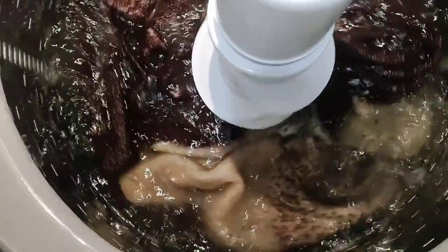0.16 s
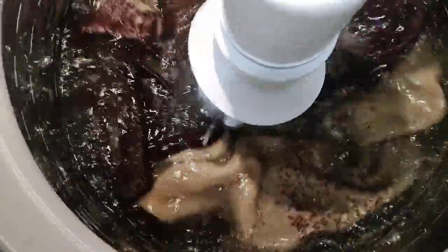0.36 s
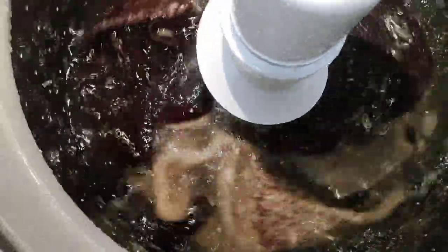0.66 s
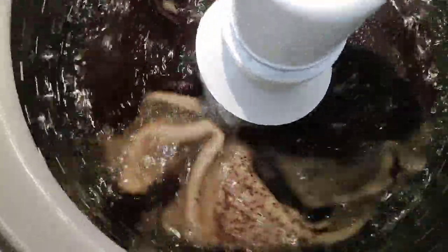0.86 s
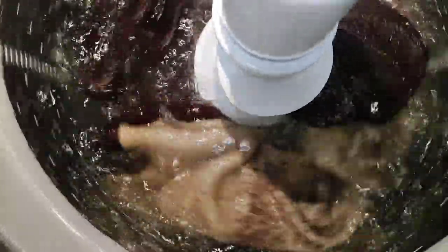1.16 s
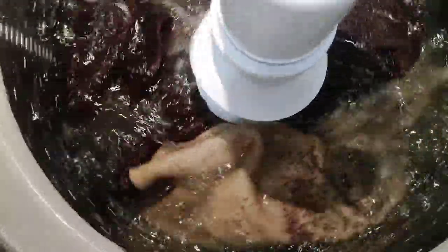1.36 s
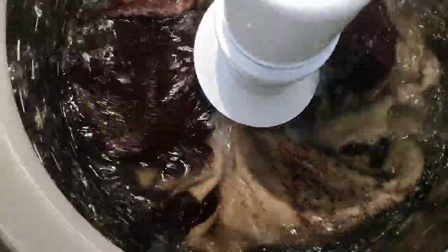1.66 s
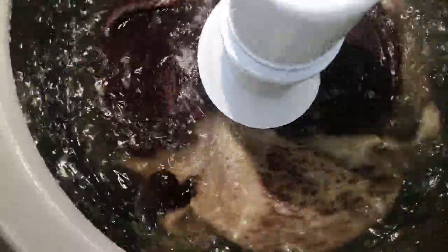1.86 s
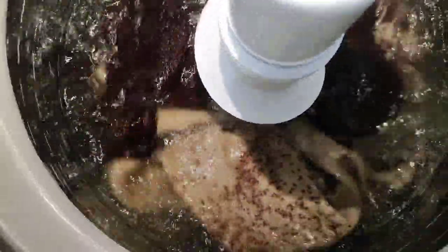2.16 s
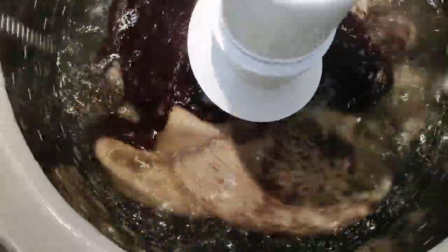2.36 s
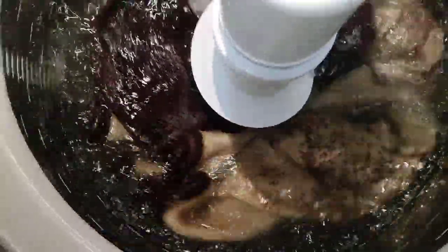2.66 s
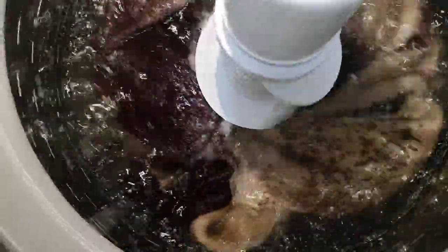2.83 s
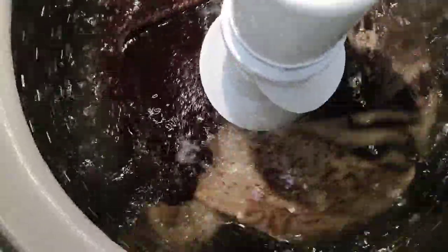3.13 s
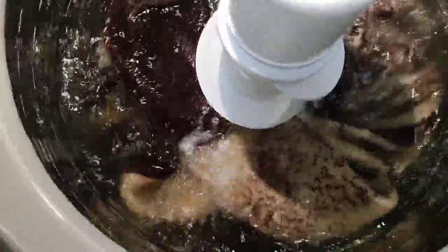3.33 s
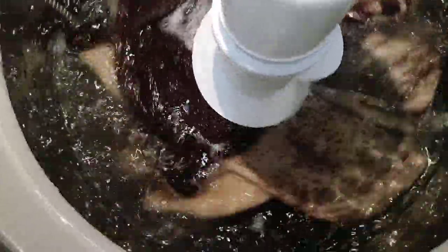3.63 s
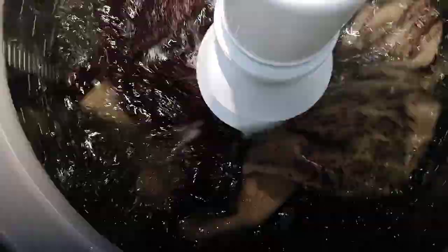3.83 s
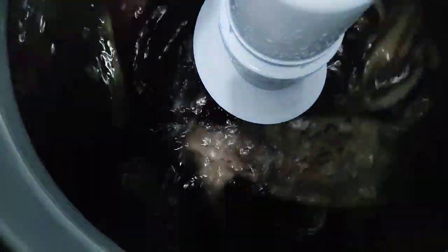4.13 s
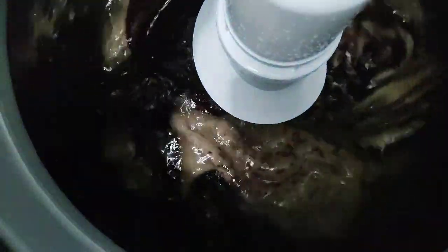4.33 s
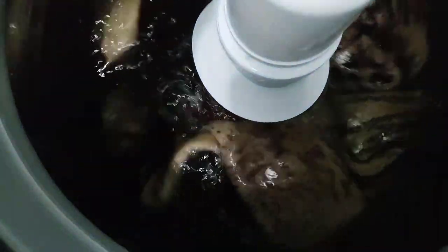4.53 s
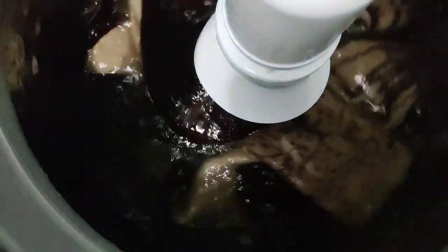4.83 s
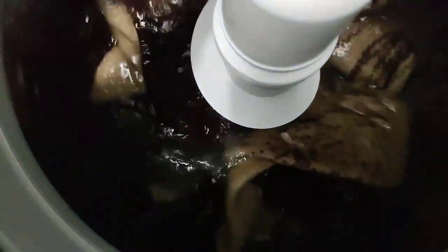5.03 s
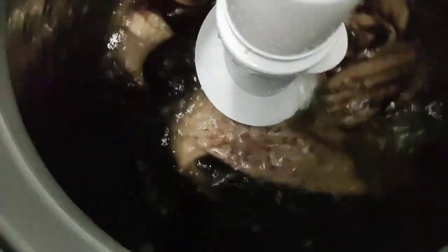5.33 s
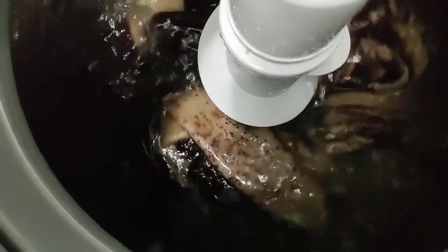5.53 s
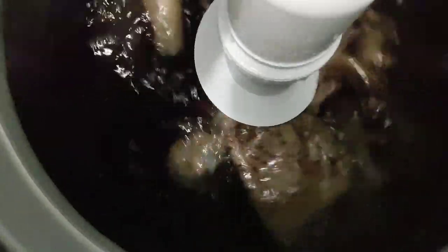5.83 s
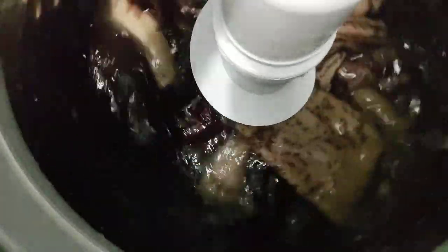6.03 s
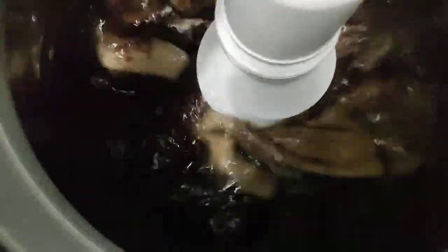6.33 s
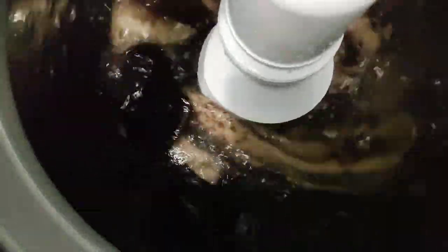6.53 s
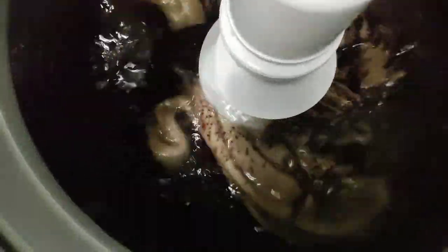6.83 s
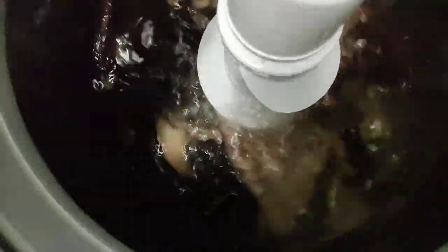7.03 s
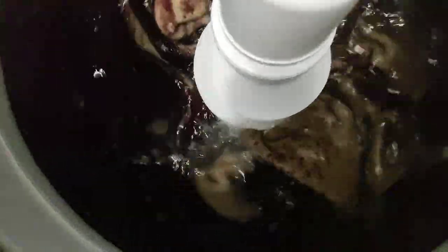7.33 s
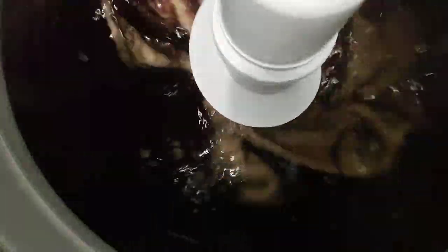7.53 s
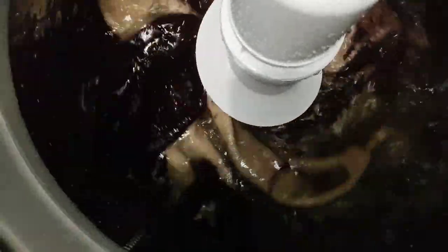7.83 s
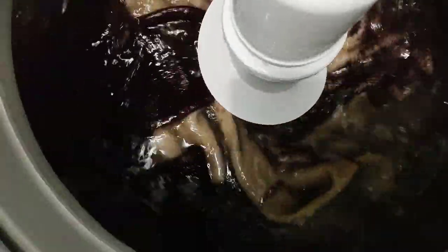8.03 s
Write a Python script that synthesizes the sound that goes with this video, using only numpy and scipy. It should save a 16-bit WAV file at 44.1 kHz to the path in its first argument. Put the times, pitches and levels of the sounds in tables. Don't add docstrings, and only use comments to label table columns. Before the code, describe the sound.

A top-loading washing machine agitates wet laundry, its motor whine pulsing on and off every 0.6 seconds with knocks, watery thuds and light splashes.

```python
import sys
import numpy as np
from scipy import signal
from scipy.fft import rfft, irfft, next_fast_len
from scipy.io import wavfile
from scipy.ndimage import uniform_filter1d

SR = 44100
rng = np.random.default_rng(int(sys.argv[2]) if len(sys.argv) > 2 else 0)


def dump_mix(stems):
    frames = np.atleast_2d(stems).T
    limited = np.clip(frames, -1, 1)
    pcm = np.round(limited * 32767).astype(np.int16)
    wavfile.write(sys.argv[1], SR, pcm)


def how_loud(loudness_db):
    steps = np.asarray(loudness_db, float) / 20
    return 10 ** steps


N = 361179
T = np.arange(N) / SR
PAD = next_fast_len(N + 8192)
HZ = np.fft.rfftfreq(PAD, 1 / SR) + 1e-3

# drive cut in seconds, whine in dB, tooth slip in dB,
# octave in dB re whine, belt in dB.
STROKES = [(-0.11, -36, 1, -17, 0), (0.49, -24.5, 0, -18, 0.5), (1.095, -31.5, -2, -13, 0),
           (1.692, -24.5, -1.5, -22, 2), (2.289, -32.5, 1.5, -13.5, -0.5), (2.89, -24.5, -3.5, -17, 1),
           (3.491, -31, -2.5, -20, 0.5), (4.09, -24, -4, -16.5, 1), (4.689, -30.5, -2.5, -16.5, 1),
           (5.29, -24, -12, -18.5, 0.5), (5.891, -31, 1, -15.5, -0.5), (6.492, -25, -11, -21, -0.5),
           (7.09, -32, -3, -18, 1), (7.69, -27, -5.5, -10.5, 0), (8.29, -36, 3, -11, 3)]
# surge in dB, froth while driven in dB, froth while coasting in dB,
# unrest before the stroke in dB, extra coasting in seconds.
WATER = [(6, 0.5, 2, 0, 0.03), (-2, -0.5, -1, 0, .01), (0.5, 1, 0, -6.5, -0.016),
         (-0.5, 0.5, 1.5, -2.5, .015), (1, -2, -1.5, -6.5, -.02), (-4.5, 2.5, -3, 1, 0.01),
         (2, 0, -6, -6.5, .02), (0.5, -3, -3.5, 0.5, .01), (0.5, 0.5, -4.5, 1.5, .01),
         (-2, -1.5, 4, 3, .045), (1.5, 2, 2, 5.5, -.03), (-0.5, 4.5, 0, 7, .02), (-1, 1.5, 0.5, -1, .001),
         (0, 3, 2.5, -0.5, .01), (0, 3.5, 0, -5, 0)]


def level(x, db):
    return x * how_loud(db) / np.sqrt(np.mean(x ** 2))


def colour(x, points):
    hz, db = np.transpose(points)
    gain_db = np.interp(np.log(HZ), np.log(hz), db, left=-90, right=-90)
    return irfft(rfft(x, PAD) * how_loud(gain_db), PAD)[:N]


def ring(x, hz, width_hz, db):
    gain = 0
    for k, (f, width, mode_db) in enumerate(zip(hz, width_hz, db)):
        damping = 1j * HZ * width
        gain = gain + (-1) ** k * how_loud(mode_db) * damping / (f * f - HZ ** 2 + damping)
    return irfft(rfft(x, PAD) * gain, PAD)[:N]


def walk(rate):
    k = int(SR / rate)
    steps = np.repeat(rng.standard_normal(N // k + 1), k)[:N]
    x = uniform_filter1d(uniform_filter1d(steps, k), k)
    return x / x.std()


def grains(rate, spread_db):
    hits = rng.random(N) < rate / SR
    return hits * rng.standard_normal(N) * how_loud(spread_db * rng.exponential(size=N))


def ports(mid, side):
    return np.array([mid + side, mid - side])


def through_strokes(load, unrest, driven_db, coasting_db):
    let_go_s, halt_s, settle_s, settle_db = 0.04, 0.0067, .185, -4.5
    (wake, full, full_db, sag_db, rest_db), ways = load
    points = []
    for k, stroke in enumerate(STROKES):
        cut, (db, drop_db, coast, halt_db) = stroke[0], ways[k % 2]
        coast = np.clip(coast + WATER[k][4], let_go_s, .205)
        after_db = db + drop_db + coasting_db[k]
        db = db + driven_db[k]
        sagged_db = after_db + sag_db
        halted_db = sagged_db + halt_db
        points += [
            (cut - wake, rest_db + unrest * WATER[k][3]),
            (cut - full, db + full_db),
            (cut, db),
            (cut + let_go_s, after_db),
            (cut + coast, sagged_db),
            (cut + coast + halt_s, halted_db),
            (cut + max(settle_s, coast + halt_s), halted_db + settle_db)]
    return np.interp(T, *np.transpose(points))


def room():
    # frequency in Hz, level in dB per Hz.
    hum_and_hiss = [(15, -32), (33, -12.5), (50, -21), (80, -9.5), (160, -6), (310, -2.5), (400, -13),
                    (630, -22.5), (1000, -27.5), (2000, -32), (4000, -40.5), (8000, -44.5), (10600, -46.5),
                    (15500, -62)]
    difference = [(15, -2.5), (40, -0.5), (70, -18.5), (350, -14.5), (500, -3.5), (16000, 1)]
    mid, side = rng.standard_normal((2, N))
    side = colour(side, difference)
    return level(ports(colour(mid, hum_and_hiss), colour(side, hum_and_hiss)), -51 - 6.5)


def shaken(modes, db):
    # frequency in Hz, level in dB.
    contact = [(20, -33.5), (150, 2), (2600, -2.5), (4000, -13), (8000, -16), (22050, -52)]
    hz, width_hz, mid_db, side_db = np.transpose(modes)
    shake = [colour(level(grains(4000, 1.4), 0), contact) * how_loud(db + 2.0 * walk(30)) for _ in range(2)]
    mid = ring(shake[0], hz, width_hz, mid_db)
    side = ring(shake[1] - .1 * shake[0], hz, width_hz, side_db)
    return ports(mid, side)


def rattle(gear_db, boom_db, belt_db):
    # frequency in Hz, width in Hz, mid in dB, side in dB.
    gear_modes = [(787.7, 35, 5.5, 7.5), (916, 150, -6.5, -3), (992, 80, 2, 4.5), (1109, 63, -0.5, 0.5),
                  (1259, 62, 1.5, -1.5), (1492, 110, -2.5, -14), (1696, 87, -4.5, -5),
                  (2000, 460, -16, -16.5), (2480, 480, -22.5, -19)]
    belt_modes = [(531.6, 50.3, -3.5, 7), (569.4, 46.4, 2.5, -0.5), (626, 115.3, 1, -5.5),
                  (685, 187, -5.5, -2), (828, 28, -7.5, -1.5)]
    cabinet_modes = [(210, 34, -14.5, -25), (233.4, 8.2, 3.5, -17), (312, 53, 6, -8), (372, 38, -1, -0.5),
                     (370, 76, -18.5, -5.5), (452, 31, 0, -7)]
    chatter = shaken(gear_modes, gear_db + 17.5)
    whirr = shaken(belt_modes, belt_db + 26.5)
    return chatter + whirr + shaken(cabinet_modes, boom_db + 22.5)


def surge(db):
    # frequency in Hz, width in Hz, level in dB.
    tub_modes = [(78.3, 18, 0.5), (100.5, 22, 3.5), (119.5, 25, 1), (155.3, 12, 2)]
    thrust = [(15, -7), (34, 4.0), (58, -11.0), (75, -1.0), (200, 0.5), (400, -19.5)]
    thuds = []
    for _ in range(2):
        push = colour(rng.standard_normal(N), thrust) * how_loud(2.1 * walk(12))
        thuds.append(level(ring(push, *np.transpose(tub_modes)), 0))
    mid, side = thuds
    return how_loud(db - 1.5) * ports(mid, how_loud(-15) * side)


def bubbles(count, low_hz, octaves, cycles):
    out, t = np.zeros((2, N + 1500)), T[:1500]
    for when, size, place, luck in rng.random((count, 4)):
        turns = low_hz * 2 ** (octaves * size) * t
        tone = np.sin(2 * np.pi * turns * (1 + 0.00017 * turns))
        tone = tone * turns * np.exp(-turns / cycles)
        pan = np.array([[place], [place - 1 + luck]])
        out[:, int(when * N):][:, :len(t)] += how_loud(-5 * luck - 10 * size) * tone * pan
    return level(out[:, :N], 0)


def fizz(db):
    # start in seconds, peak in dB, length in seconds, fine mist in dB re drops.
    splashes = [(0.15, -65.5, 0.021, -1), (0.535, -57.5, 0.036, -3), (1.087, -61.5, .04, -8),
                (1.897, -66, 0.033, 6.5), (2.365, -64, 0.026, 0.5), (2.971, -66.5, 0.03, -1),
                (4.191, -62.5, 0.034, -5.5), (4.946, -60.5, 0.03, -7.5), (5.335, -60, 0.026, 0.5),
                (5.4494, -61, 0.035, -2.5), (5.861, -63, .04, -4), (5.9816, -56, 0.022, 3),
                (6.059, -52, 0.042, -7), (6.494, -60.5, 0.028, 0), (6.555, -65, 0.03, -0.5),
                (6.812, -57, 0.036, 1.5), (6.994, -60, 0.03, 0.5), (7.085, -60, 0.025, -3),
                (7.12, -56, 0.046, -3), (7.255, -62.5, 0.03, 1), (7.665, -56.5, 0.035, -1.5),
                (7.752, -55.5, 0.03, -3), (7.895, -63, 0.045, 6), (8.183, -47.5, 0.0056, 9)]
    # frequency in Hz, level in dB per Hz.
    froth = [(1200, -16), (2000, 0.5), (2600, -1.5), (3200, -13), (4000, -12.5), (5000, -33), (8000, -39.5),
             (10500, -39.5), (13000, -46), (15500, -52)]
    # frequency in Hz, level in dB.
    drop_spectrum = [(1000, -16.5), (2500, 0.5), (4600, -2), (6500, -10.5), (11000, -22), (16000, -30)]
    mist_spectrum = [(2500, -14.5), (6000, -2.5), (9800, 0), (11500, -9), (16000, -16)]

    spray = np.zeros((2, N))
    for s, peak_db, length, fine_db in splashes:
        start = int(s * SR)
        t = T[:8000] / max(length, .005)
        shape = how_loud(peak_db - 4.5) * np.exp(-t) * (1 - np.exp(-2.5 * t))
        spray[:, start:][:, :len(t)] += shape[:N - start] * how_loud(np.array([[0], [fine_db]]))

    pops = []
    for _ in range(2):
        bursts = level(grains(5900, 1.7), 0) + 0.35 * rng.standard_normal(N)
        pops.append(level(colour(bursts, froth), 0) * how_loud(3.5 * walk(25)))

    def patter(points):
        return np.array([level(colour(grains(4400, 2.1), points), 0) * how_loud(4.0 * walk(70)) for _ in range(2)])

    wet, mist = patter(drop_spectrum), patter(mist_spectrum)
    gurgle = how_loud(3.0) * bubbles(count=600, low_hz=801.4, octaves=1.8, cycles=10)
    drops = how_loud(4.0) * bubbles(count=1100, low_hz=1509, octaves=2.1, cycles=8.2)
    surface = how_loud(db + 3.0) * (np.array(pops) + gurgle)
    thrown = spray[0] * (wet + drops) + how_loud(-8.5) * spray[1] * mist
    return (surface + thrown) * how_loud(np.array([[-.6], [.6]]))


def knocks():
    # start in seconds, peak in dB, frequency in Hz.
    blows = [(0.014, -34, 316.4), (0.519, -37.5, 326), (0.607, -41.5, 312), (1.229, -33.5, 339),
             (1.821, -35, 308), (2.429, -46, 356), (3.019, -45, 353), (3.139, -47.5, 302),
             (3.618, -37, 306), (4.132, -34.5, 310), (4.218, -36.5, 312), (4.335, -42.5, 280),
             (4.813, -35, 337), (5.328, -34, 312), (5.433, -32, 351), (5.533, -42, 307), (6.032, -39, 328),
             (6.555, -32.5, 314), (6.629, -30, 335.4), (7.211, -35, 327), (7.821, -35, 318),
             (8.024, -51, 312)]
    mid, t = np.zeros(N + 4000), T[:4000]
    shape = (t / 0.0094) ** 2 * np.exp(2 - 2 * t / 0.01)
    for s, db, hz in blows:
        tone = np.sin(2 * np.pi * hz * t) + how_loud(-24.5) * np.sin(2 * np.pi * 1.9 * hz * t)
        mid[int(s * SR):][:len(t)] += how_loud(db) * shape * tone
    mid = mid[:N]
    return ports(mid, how_loud(-15) * np.roll(mid, 30))


def drive():
    mesh_hz, lag_hz, spin_up_s, creep_hz_per_s = 314, 31.96, .035, 18
    drive_s, take_up_s, cut_s, tail_db, tail_s = .205, .035, 0.01, -16, 0.044
    slip_before_s, slip_s = .09, .012
    # whine climb in dB, throb depth from 0 to 1, throb peak in seconds before the cut.
    climb_db = (-2.5, -9)
    throb_depth = (.2, 0.36)
    throb_s = (0.017, 0.0094)

    cuts, top_db, slip_db, octave_db, _ = np.transpose(STROKES)
    k = np.searchsorted(cuts + .2, T)
    t, way = T - cuts[k], k % 2
    since = np.maximum(t + drive_s, -take_up_s)
    hz = mesh_hz - lag_hz * np.exp(-np.maximum(since, 0) / spin_up_s) + creep_hz_per_s * t
    times = [-drive_s - take_up_s - .03, -drive_s - take_up_s, -drive_s, -drive_s + take_up_s,
             -cut_s, 0, tail_s, tail_s + .02]
    shape_db = np.interp(t, times, [-60, -32, -11, 0, 0, tail_db, tail_db, -55])
    db = top_db[k] + shape_db + np.take(climb_db, way) * np.clip(-t / drive_s, 0, 1)
    slip = slip_db[k] * np.exp(-((t + slip_before_s) / slip_s) ** 2)
    turn = 2 * np.pi * mesh_hz / 11 * (t + np.take(throb_s, way)) + 0.6 * walk(4.7)
    throb = 1 + np.clip(np.take(throb_depth, way), 0, .9) * np.cos(turn)
    return hz, db + slip, octave_db[k], throb


def whine():
    # multiple of the mesh tone, level in dB re whine, side in dB re mid.
    mesh_orders = [(.5, -31, -12.5), (.75, -24.5, -14), (1.5, -34, -5), (2.52, -22.5, 3), (3.3, -38, 2),
                   (4.05, -32, 0)]
    *controls, throb = drive()
    hz, db, octave_db = (uniform_filter1d(1. * c, size=300) for c in controls)
    phase = 2 * np.pi * np.cumsum(hz * (1 + 0.00504 * walk(50))) / SR
    slow_db = uniform_filter1d(db, size=1800)
    octave = how_loud(slow_db + octave_db + 1.3 * walk(30))
    mid = throb * how_loud(db + 0.7 * walk(35)) * np.sin(phase) + octave * np.sin(2.02 * phase)
    side = how_loud(db - 23.5) * np.cos(phase) + how_loud(8.5) * octave * np.cos(2.02 * phase)
    for multiple, mid_db, side_db in mesh_orders:
        angle = multiple * phase + .45 * walk(25)
        size = how_loud(slow_db + mid_db + 2.9 * walk(18))
        mid = mid + size * np.sin(angle)
        side = side + how_loud(side_db) * size * np.cos(angle)
    return np.sqrt(2) * ports(mid, side)


def scene():
    # dB at the cut, drop in dB
    # when the drive lets go, coast end in seconds after the cut, halt drop in dB.
    gear_load = (0.38, 0.19, -2, -2, -75.5), [(-50.5, -2.5, 0.062, -4.5), (-50.5, -5, .15, -4.5)]
    belt_load = (0.42, .26, 0.5, -7.5, -76.5), [(-52, -4, .07, -1.5), (-50, -7.5, 0.14, -8)]
    boom_load = (0.33, 0.2, -1, -5.5, -64.5), [(-46, -1.5, .09, -1), (-45, -2, .15, -8)]
    surge_load = (0.4, -0.01, 2, -4, -60), [(-44.5, -2.7, 0.066, -0.5), (-50, -0.51, 0.17, 2)]
    fizz_load = (0.47, 0.18, -4, -1.5, -84), [(-67.5, 1.3, 0.055, -1.5), (-71, 2.6, .15, -3.5)]

    belt_db = np.transpose(STROKES)[4]
    surge_db, froth_db, after_db, *_ = np.transpose(WATER)
    gears = through_strokes(gear_load, 0.76, .3 * froth_db, 0.38 * after_db)
    boom = through_strokes(boom_load, 0.7, 0 * belt_db, 0.25 * after_db)
    belt = through_strokes(belt_load, 0.9, belt_db, belt_db)
    thud = through_strokes(surge_load, 0.66, surge_db, surge_db)
    froth = through_strokes(fizz_load, 0.99, froth_db, after_db)
    return room() + rattle(gears, boom, belt) + surge(thud) + fizz(froth) + knocks() + whine()


def band_limit(x):
    return signal.sosfilt(signal.butter(12, 15100, fs=SR, output="sos"), x)


def record(dry):
    return band_limit(dry)


dry = scene()
out = record(dry)
dump_mix(out)
```